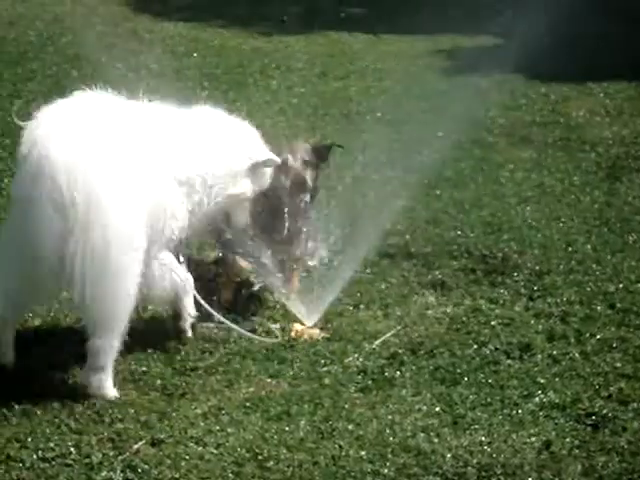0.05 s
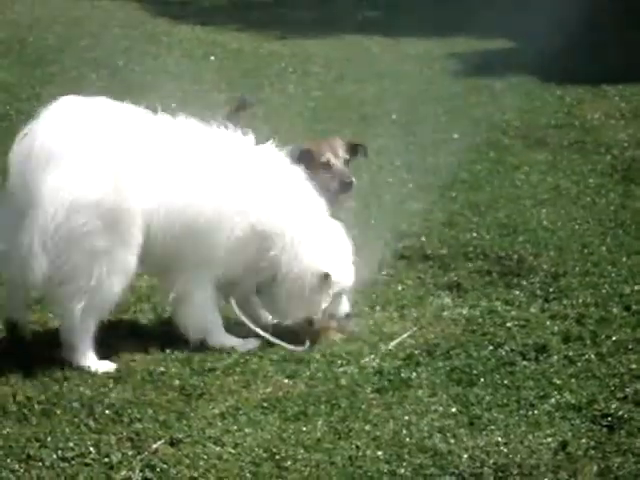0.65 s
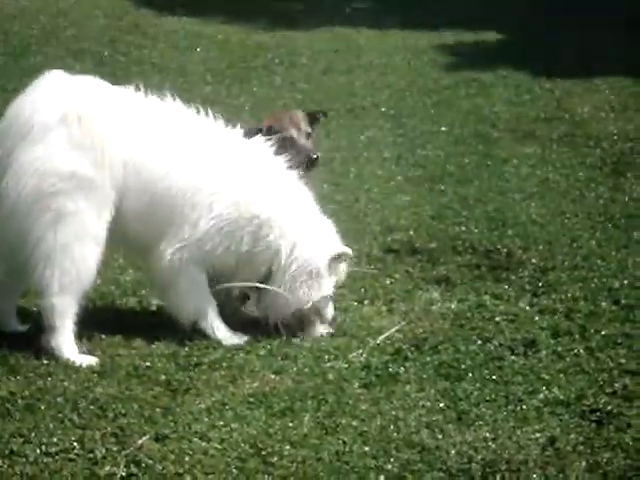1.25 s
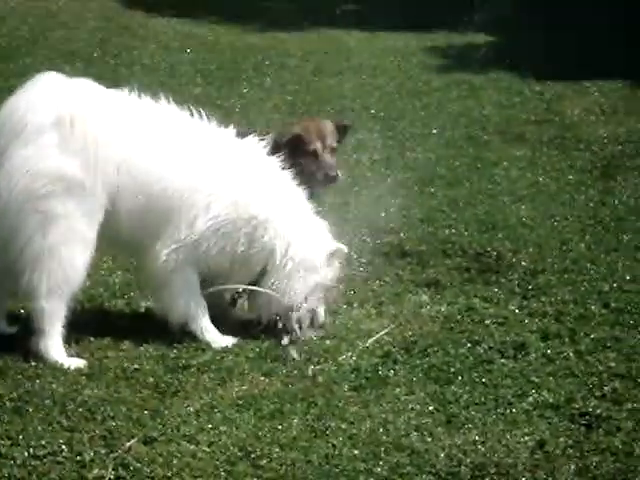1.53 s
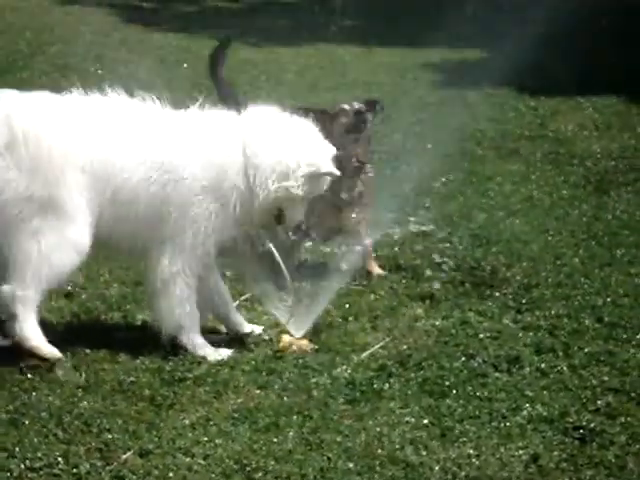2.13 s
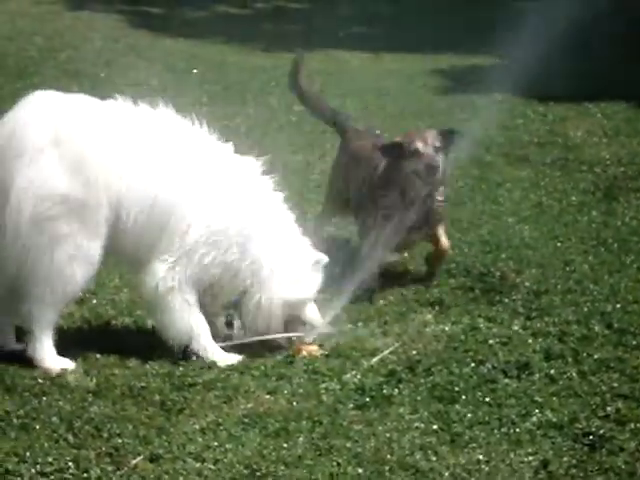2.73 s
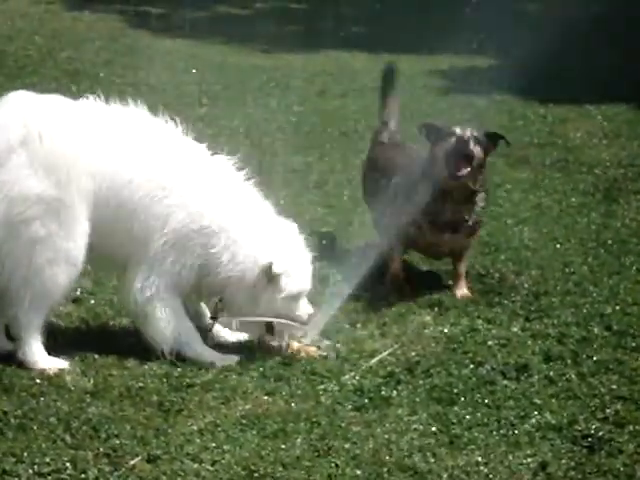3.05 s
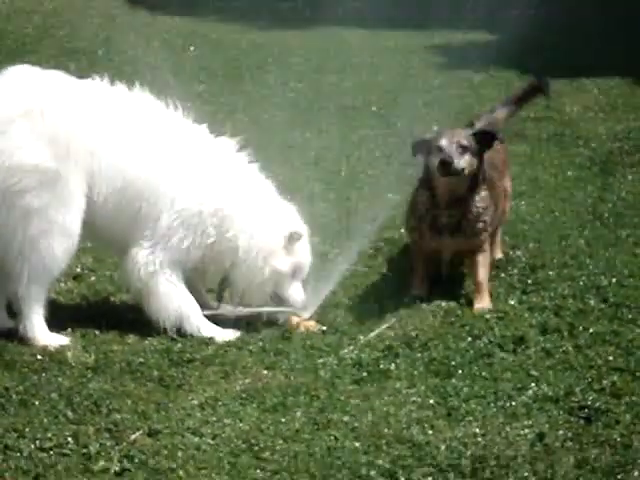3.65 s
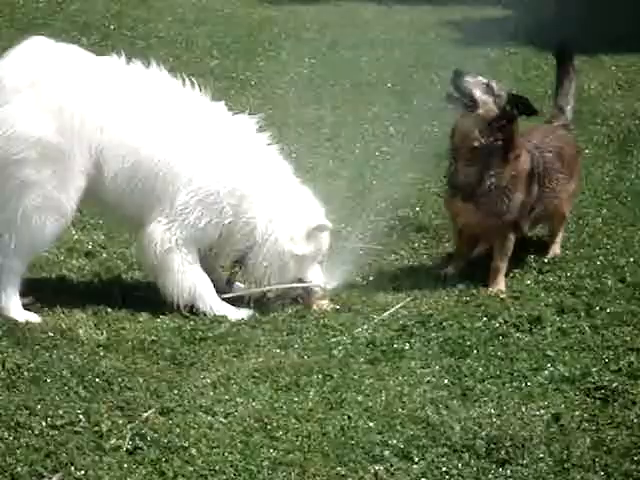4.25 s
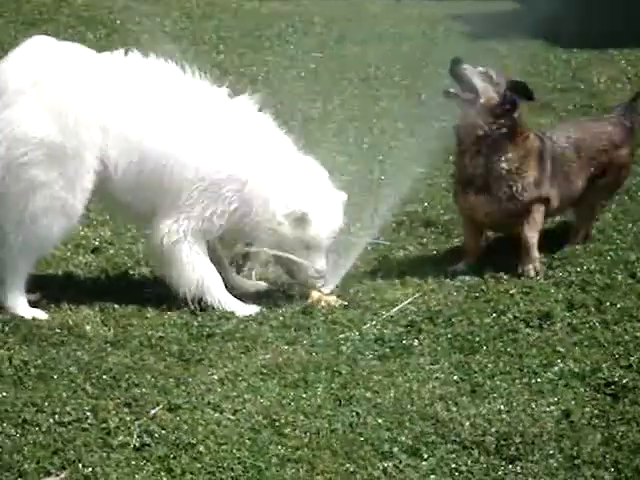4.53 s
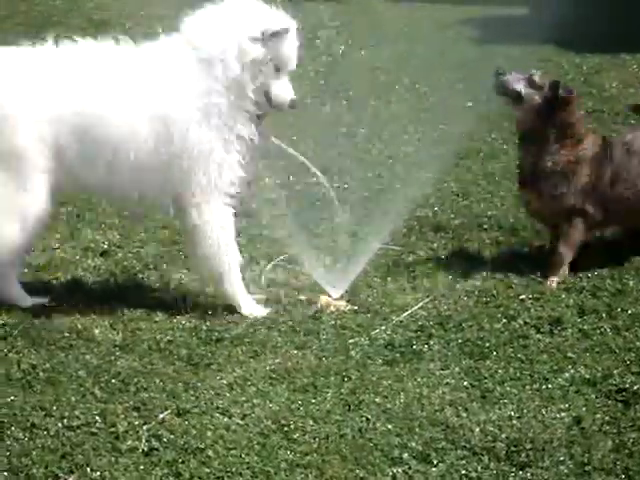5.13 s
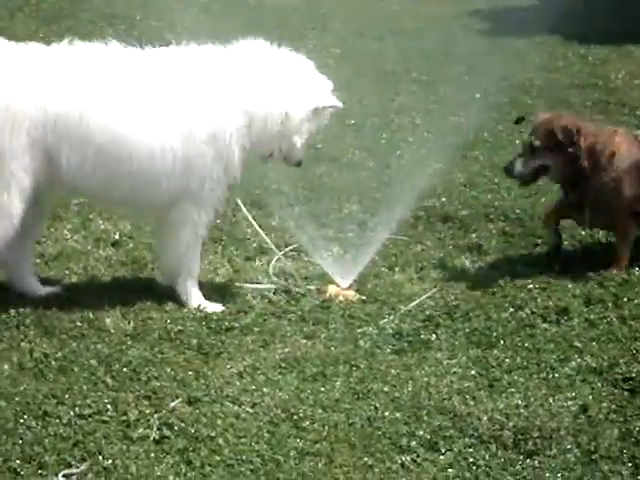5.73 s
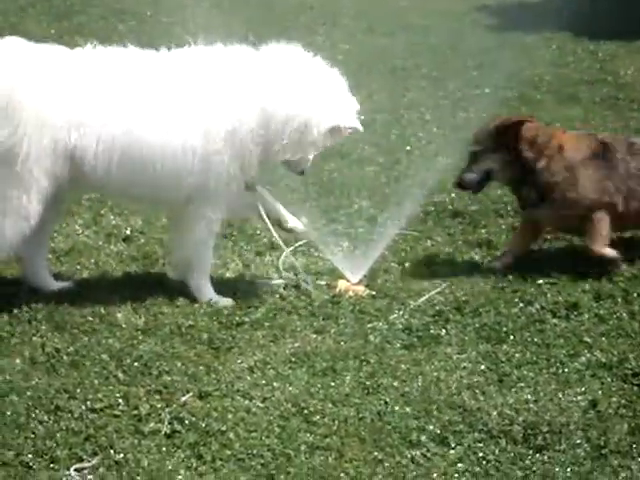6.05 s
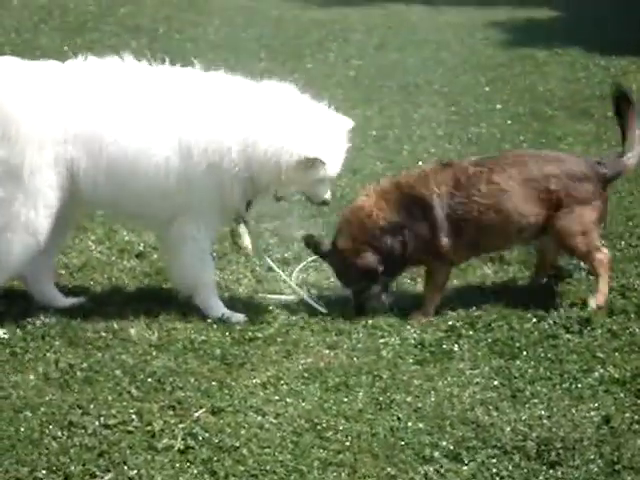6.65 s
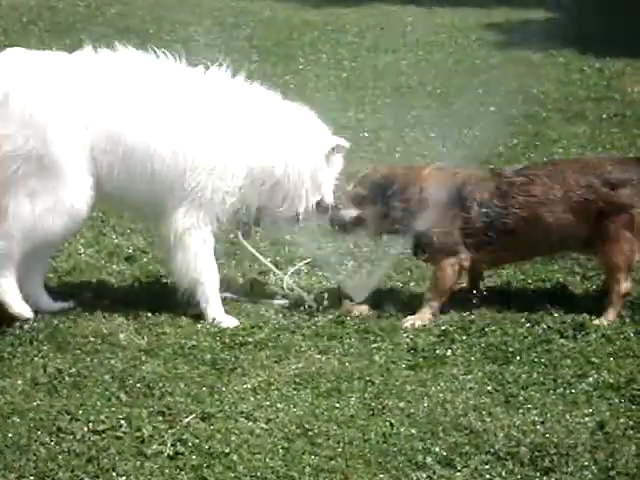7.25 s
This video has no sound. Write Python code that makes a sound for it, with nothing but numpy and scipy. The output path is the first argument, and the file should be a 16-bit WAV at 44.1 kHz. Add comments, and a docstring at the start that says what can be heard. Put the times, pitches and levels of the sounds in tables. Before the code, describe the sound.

A lawn sprinkler hisses throughout, a high, fine sizzle with a faint wavering whistle. From about 0.6 to 1.8 seconds, two dogs snap at the jet in a quick run of splashy bursts: water fizzes on fur, spatters on snouts and drums hollowly in open mouths, with sharp little squirts around 1.4 seconds. Another strong cluster comes at 2.6 to 3 seconds, then shorter, scattered splashes and squirts until about 4.9. At 5.2 seconds a collar tag rattles once in a few quick clinks, and the spray continues nearly alone. From 6.3 to 7.2 seconds the snapping returns in a dense flurry, with water squirting past teeth. Wind bumps the small mono microphone with soft low thumps, around 0.5 to 1 second and most between 2.7 and 3.6. A dull wash of garden air and a faint low drone sit underneath.

```python
"""A lawn sprinkler hisses in a garden while two dogs snap at its jet.
The water, fine droplets as noise and larger ones as ticks, fizzes on fur, spatters on snouts,
drums in open mouths and squirts past teeth. A collar tag rattles once, in a few quick clinks.
Wind bumps the mono microphone of a small camera, over a dull wash of air and a faint drone."""
import sys
import numpy as np
from scipy import signal
from scipy.fft import rfft, irfft
from scipy.io import wavfile
from scipy.ndimage import uniform_filter1d

SR = 44100
rng = np.random.default_rng(int(sys.argv[2]) if len(sys.argv) > 2 else 0)


def waveform_to_disk(signal):
    """Save audio, clipped to [-1, 1], as 16-bit WAV at the path in sys.argv[1]."""
    frames = np.transpose(np.atleast_2d(signal))
    scaled = np.clip(frames, -1, 1) * 32767
    samples = np.round(scaled).astype(np.int16)
    wavfile.write(sys.argv[1], SR, samples)


N = 330309
T, HZ = np.arange(N) / SR, np.fft.rfftfreq(N, 1 / SR)


def gain_of(db):
    """Decibels to amplitude."""
    return 10 ** (np.asarray(db) / 20)


def unit_rms(x):
    """Scale to rms 1."""
    return x / np.sqrt(np.mean(x ** 2) + 1e-20)


def curve(rows, column=1):
    """Table column, linearly interpolated over time."""
    rows = np.asarray(rows)
    return np.interp(T, rows[:, 0], rows[:, column])


def coloured(x, spectrum):
    """Filter by (frequency [Hz], gain [dB]) points; rms 1."""
    hz, db = np.transpose(spectrum)
    response = gain_of(np.interp(np.log(HZ + 1), np.log(hz), db))
    return unit_rms(irfft(rfft(x) * response, N))


def bell(x, centre, width):
    """Gaussian hump; full width at half height."""
    return 2 ** (-(2 * (x - centre) / width) ** 2)


def noise_band(n, centre_hz, width_hz):
    """n samples of noise with a bell-shaped power spectrum; rms 1."""
    response = np.sqrt(bell(np.fft.rfftfreq(n, 1 / SR), centre_hz, width_hz))
    return unit_rms(irfft(rfft(rng.standard_normal(n)) * response, n))


def flutter(rate_hz):
    """Random wavering; rms 1."""
    steps = rng.standard_normal(4096)
    return unit_rms(np.interp(T * rate_hz, np.arange(len(steps)), steps))


def burst(start_s, length_s, attack_s, release_s):
    """Linear attack, hold until length_s, Gaussian release."""
    t = T - start_s
    return np.clip(t / attack_s, 0, 1) * np.exp(-np.clip((t - length_s) / release_s, 0, 5) ** 2)


def resonate(x, hz, width_hz):
    """Two-stage resonator tracking the curve hz; rms 1."""
    carrier = np.exp(2j * np.pi * np.cumsum(hz) / SR)
    pole = np.exp(-np.pi * width_hz / SR)
    baseband = signal.lfilter([1], [1, -2 * pole, pole * pole], x / carrier)
    return unit_rms((carrier * baseband).real)


def add(mix, start_s, sound):
    """Mix sound in at start_s."""
    part = mix[max(round(start_s * SR), 0):][:len(sound)]
    part += sound[:len(part)]


def water(drops_per_s, drop_share, spread_db):
    """Fine droplets merge into noise; larger ones tick, carrying drop_share of the power."""
    size = gain_of(spread_db * np.minimum(rng.exponential(1, N), 4)) * rng.choice([-1, 1], N)
    drops = unit_rms(size * (rng.random(N) < drops_per_s / SR))
    return np.sqrt(drop_share) * drops + np.sqrt(1 - drop_share) * rng.standard_normal(N)


def nozzle(sizzle_db=1.5, waver_db=1.5, whistle_db=-1):
    """The fan of water tears into droplets leaving the sprinkler; the slot whistles."""
    # dogs cover and uncover the nozzle: (time [s], sizzle [dB], whistle [dB])
    levels = [(0, -55, -53), (.6, -49, -51), (.8, -48, -48), (1.3, -52.5, -60), (2.1, -50.5, -50),
              (2.55, -51, -46), (3.1, -48.5, -50.5), (3.4, -49.5, -44.5), (3.8, -49, -62), (4.6, -46, -62),
              (5.1, -48.5, -60), (6.2, -50, -51), (6.8, -58, -54), (7.49, -50.5, -69)]
    # spray spectrum: (frequency [Hz], gain [dB])
    sizzle_spectrum = [(1500, -27.5), (3500, -7.5), (4000, -5.5), (4500, 1.5), (5300, 1), (6000, -5),
                       (8000, -28), (10000, -36)]
    spray = coloured(water(drops_per_s=6100, drop_share=0.15, spread_db=2.5), sizzle_spectrum)
    whistle = noise_band(N, centre_hz=4660, width_hz=450)
    return (spray * gain_of(sizzle_db + curve(levels, column=1) + waver_db * flutter(200))
            + whistle * gain_of(whistle_db + curve(levels, column=2)))


def snapping(rise_octaves_per_s=1.2):
    """Jaws close on the jet, resonance climbing. Returns (fur, snout, mouth) power and jaw Hz."""
    # snaps: (start [s], length [s], fur [dB], snout [dB], mouth [dB], mid-snap jaw resonance [Hz])
    snaps = [(0.0, 0.13, -55, -46.5, -54, 2700), (0.628, 0.074, -41, -47.5, -46, 2800),
             (0.689, 0.1, -39.5, -42.5, -41.5, 2900), (0.819, .16, -37, -44, -42, 2850),
             (0.999, 0.098, -42, -43.5, -43, 2390), (1.102, 0.084, -45, -43, -40, 1750),
             (1.241, 0.055, -45.5, -43.5, -37.5, 1960), (1.32, .18, -41.5, -41.5, -38, 1960),
             (1.527, 0.12, -43, -41.5, -40, 2000), (1.668, 0.095, -56, -39.5, -38.5, 1840),
             (1.77, 0.05, -45, -53, -41, 2460), (2.59, .045, -38, -45.5, -41, 2740),
             (2.654, .11, -32.5, -45, -45, 2750), (2.764, 0.1, -36.5, -46, -40, 2680),
             (2.875, 0.05, -47, -46.5, -38.5, 2700), (3.04, 0.073, -60, -52, -43.5, 2620),
             (3.34, .04, -48, -54, -45, 2600), (3.695, .045, -40, -65, -43, 2480),
             (3.837, 0.051, -58, -65, -41, 2500), (3.985, 0.033, -43, -57, -39, 2450),
             (4.033, 0.034, -37, -44.5, -40.5, 2430), (4.157, .11, -41.5, -50, -43.5, 2500),
             (4.314, 0.093, -39, -43.5, -44.5, 2480), (4.637, 0.052, -40.5, -54, -42.5, 2600),
             (4.757, 0.038, -45, -44, -43.5, 2750), (4.809, 0.045, -39, -56, -36.5, 1890),
             (5.174, .1, -54, -49, -49.5, 2470), (6.337, 0.11, -37, -43.5, -40.5, 2400),
             (6.482, 0.09, -34, -43, -43.5, 2800), (6.597, .13, -39, -40.5, -41.5, 2800),
             (6.765, 0.057, -50, -42.5, -43.5, 1500), (6.847, 0.06, -43, -38.5, -42, 2150),
             (6.919, 0.13, -37.5, -44, -45, 3180), (7.104, 0.12, -56, -46.5, -53, 3020)]
    power, weighted_hz, weight = np.zeros((3, N)), np.zeros(N), np.zeros(N)
    for start_s, length_s, fur_db, snout_db, mouth_db, jaw_hz in snaps:
        hit = burst(start_s, length_s, attack_s=0.024, release_s=0.049) ** 2
        swell = burst(start_s, length_s, attack_s=0.029, release_s=0.036) ** 2  # fizz lags the smack
        power += gain_of([[fur_db], [snout_db], [mouth_db]]) ** 2 * [swell, hit, hit]
        closing_s = np.clip(T - start_s, 0, length_s) - length_s / 2
        weighted_hz += hit * jaw_hz * 2 ** (rise_octaves_per_s * closing_s)
        weight += hit
    return power, weighted_hz / (weight + 1e-30)


def patchy(x, depth_db):
    """A splash changes colour at random, in patches of about 350 Hz by 20 ms."""
    frames = signal.stft(x, nperseg=512)[2]
    patches = uniform_filter1d(rng.standard_normal(frames.shape), size=4, axis=0)
    patches = uniform_filter1d(patches, size=3, axis=1)
    return signal.istft(frames * gain_of(depth_db * unit_rms(patches)), nperseg=512)[1][:N]


def jet_on_dogs(fur_rest_db=-47.5, snout_rest_db=-52, mouth_rest_db=-49.5, mouth_trim_db=-1,
                hollow_above_db=-41, hollow_span_db=4):
    """The broken jet lands in uneven slugs on fur, on snouts and in open mouths."""
    # splash spectra: (frequency [Hz], gain [dB])
    fur_spectrum = [(300, -30), (1500, -20), (3500, -3), (4500, -2.5), (6000, 1), (7000, 2.5), (8400, 1),
                    (9300, -2), (10000, -8.5)]
    snout_spectrum = [(400, -28.5), (1300, -4.5), (2400, -4), (3800, -3), (5000, -5.5), (7000, -8),
                      (10000, -28)]
    mouth_spectrum = [(100, -16.5), (400, -7.5), (750, 0), (1050, -1), (1500, -4.5), (2100, -8.5),
                      (4000, -19.5), (9000, -17)]
    # spray raining on the coats between snaps: (time [s], gain [dB])
    shower = [(0, 3.5), (.55, 0), (1.2, -1.5), (1.88, 6), (2.25, 0), (3.4, 3), (4.45, 5), (5.05, 0.5),
              (6.1, -1.3), (6.35, 6), (7.25, 3.5), (7.49, 2.5)]
    snap_power, jaw_hz = snapping()
    shower_db = curve(shower)
    rest = gain_of([fur_rest_db + shower_db, snout_rest_db + shower_db, mouth_rest_db + 0.2 * shower_db])
    fur_db, snout_db, mouth_db = 10 * np.log10(snap_power + rest ** 2)
    fur = coloured(water(drops_per_s=6700, drop_share=0.26, spread_db=5), fur_spectrum)
    snout = coloured(water(drops_per_s=1800, drop_share=0.37, spread_db=3.5), snout_spectrum)
    # a direct hit on the snout takes on the jaw resonance
    cavity = resonate(rng.standard_normal(N), jaw_hz, width_hz=1200)
    hollow = (1 + np.tanh((snout_db - hollow_above_db) / hollow_span_db)) / 2
    snout = np.sqrt(1 - hollow) * snout + np.sqrt(hollow) * (snout + cavity) / np.sqrt(2)
    mouth = coloured(water(drops_per_s=800, drop_share=0.36, spread_db=0.5), mouth_spectrum)
    splash = (fur * gain_of(fur_db + 1.5 * flutter(160))
              + snout * gain_of(snout_db - 0.5 * flutter(120))
              + mouth * gain_of(mouth_db + mouth_trim_db))
    return patchy(splash, depth_db=2.04)


def garden(air_db=-49.5, drone_db=-2):
    """Dull, steady wash of open air with a faint low drone."""
    # open-air spectrum: (frequency [Hz], gain [dB])
    air_spectrum = [(20, -23), (45, -15), (100, -4.5), (200, -1), (340, 1), (600, -3), (1000, -7.5),
                    (2000, -14), (10000, -41)]
    # drone: (time [s], pitch [Hz], level [dB])
    drone_track = [(0, 132.5, -56.5), (1.2, 130, -55), (2, 128.5, -52.5), (2.6, 124, -64), (7.49, 117, -60)]
    drone = resonate(rng.standard_normal(N), curve(drone_track, column=1), width_hz=19)
    air = coloured(rng.standard_normal(N), air_spectrum)
    return air * gain_of(air_db) + drone * gain_of(drone_db + curve(drone_track, column=2))


def wind(rumble_db=-1, knock_db=-15, knock_ratio=3.1, wake_db=-15, wake_s=0.06):
    """Turbulence at the microphone; each eddy is a pressure swing, a quicker knock and a rumbling wake."""
    # light air between gusts: (time [s], level [dB])
    breeze = [(0, -60), (.8, -61), (2.9, -54), (3.9, -63), (6.2, -64), (7.49, -52)]
    # gusts: (start [s], length [s], level [dB])
    gusts = [(0.694, 0.056, -43.5), (0.866, 0.16, -43), (1.2, .04, -47), (2.02, .26, -48),
             (2.428, 0.053, -49), (2.674, .21, -38.5)]
    # single eddies: (centre [s], level [dB], frequency [Hz], half length [s])
    puffs = [(0.502, -34, 65, 0.012), (0.507, -27, 131, 0.0054), (1.009, -38, 75, 0.0071),
             (2.051, -39, 70, 0.012), (2.719, -35, 67, 0.015), (2.816, -29, 89, 0.0084),
             (2.855, -33, 140, 0.012), (2.874, -24.5, 109, 0.0029), (3.103, -30, 84.5, 0.003),
             (3.33, -27.5, 115, 0.0048), (3.589, -29.5, 141, 0.0033), (6.912, -39, 112, 0.011),
             (7.388, -39, 85, 0.0069)]
    # turbulence spectrum: (frequency [Hz], gain [dB])
    spectrum = [(15, -28), (45, -1), (90, -1.5), (170, -8), (330, -12), (600, -42), (2000, -58)]
    rumble = coloured(rng.standard_normal(N), spectrum)
    gust_power = sum((gain_of(db) * burst(start_s, length_s, attack_s=0.016, release_s=0.049)) ** 2
                     for start_s, length_s, db in gusts)
    wake_power = sum((gain_of(db + wake_db) * bell(T, centre_s, wake_s)) ** 2
                     for centre_s, db, _, _ in puffs)
    out = rumble * gain_of(rumble_db) * np.sqrt(gain_of(curve(breeze)) ** 2 + gust_power + wake_power)
    t = np.arange(-SR // 10, SR // 10) / SR
    for centre_s, db, hz, half_s in puffs:
        swing = np.exp(-(t / half_s) ** 2) * np.sin(2 * np.pi * (hz * t + rng.random()))
        knock = np.exp(-(2 * t / half_s) ** 2) * np.sin(2 * np.pi * (knock_ratio * hz * t + rng.random()))
        add(out, centre_s + t[0], gain_of(db) * (swing + gain_of(knock_db) * knock))
    return out


def squirts():
    """Water squeezing past lips or teeth rings with a brief fuzzy pitch."""
    # squirts: (centre [s], length [s], pitch [Hz], bandwidth [Hz], level [dB])
    events = [(1.395, 0.029, 4300, 700, -30), (1.441, 0.013, 4150, 600, -33.5),
              (1.492, 0.034, 4600, 700, -37), (2.755, 0.034, 3860, 450, -39.5),
              (4.215, 0.07, 4080, 400, -39.5), (4.392, 0.03, 4050, 500, -40),
              (4.399, 0.013, 6700, 2000, -31.5), (4.839, 0.039, 6600, 1400, -36),
              (6.366, 0.03, 1450, 300, -39), (6.873, 0.066, 2170, 1000, -36.5),
              (6.998, 0.1, 3300, 1010, -35.5)]
    out, t = np.zeros(N), np.arange(SR // 2) / SR
    for centre_s, length_s, hz, width_hz, db in events:
        rush = noise_band(len(t), hz, width_hz)
        add(out, centre_s - t.mean(), gain_of(db) * rush * bell(t, t.mean(), length_s))
    return out


def collar_tag(tag_db=-3, tick_db=-5, tick_s=0.002):
    """The wet tag rattles as a dog lifts its head; each knock ticks and rings."""
    # knocks: (time [s], level [dB])
    clinks = [(5.204, -22.5), (5.213, -29), (5.232, -29), (5.243, -30), (5.27, -37)]
    # tag modes: (frequency [Hz], level [dB], t60 [s])
    modes = [(1835, -10, 0.046), (2520, -17, 0.017), (3000, -10, .02), (3480, -3, 0.037),
             (3630, -12, 0.027)]
    out, t = np.zeros(N), np.arange(SR // 5) / SR
    for start_s, db in clinks:
        ring = sum(gain_of(mode_db - 60 * t / t60_s) * np.sin(2 * np.pi * (hz * t + rng.random()))
                   for hz, mode_db, t60_s in modes)
        tick = gain_of(tick_db) * rng.standard_normal(len(t)) * np.exp(-t / tick_s)
        add(out, start_s, gain_of(db + tag_db) * (ring + tick))
    return out


def scene():
    """All sources at one microphone; identical channels."""
    mono = nozzle() + jet_on_dogs() + garden() + wind() + squirts() + collar_tag()
    return np.array([mono, mono])


def record(dry):
    """Reflections at the camera body ripple the spectrum; a low-pass limits the band."""
    # ripples: (centre [Hz], width [Hz], gain [dB])
    ripples = [(492, 147, -3.2), (814, 239, 2.5), (1120, 239, -1.3), (1454, 233, 3.2), (1928, 411, -.9),
               (2565, 276, 2.6), (2902, 246, -2.3), (3221, 167, .9), (3525, 241, -5), (3869, 317, 1.7),
               (4330, 184, -2.5), (4670, 289, 1.8), (5047, 221, -4.4), (5701, 260, -5), (6053, 183, .8),
               (6313, 208, -2.2), (9240, 288, -2.6)]
    response = gain_of(sum(db * bell(HZ, hz, width_hz) for hz, width_hz, db in ripples))
    heard = irfft(rfft(dry) * response, N)
    lowpass = signal.firwin(1023, cutoff=10100, window=("kaiser", 9), fs=SR)
    return signal.oaconvolve(heard, lowpass[None], "same")


dry = scene()
out = record(dry)
waveform_to_disk(out)
```